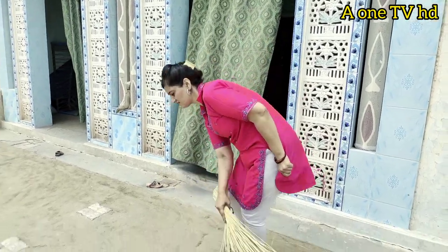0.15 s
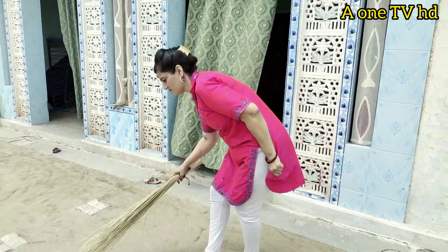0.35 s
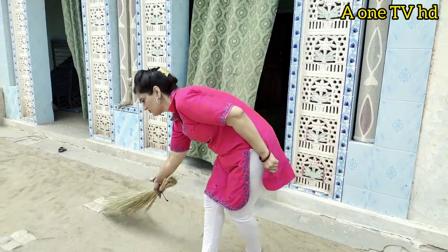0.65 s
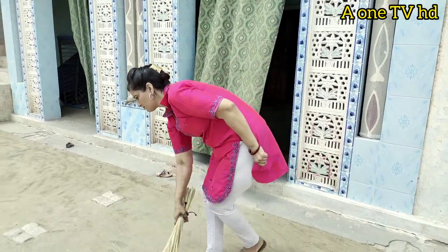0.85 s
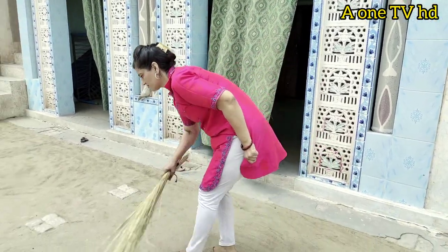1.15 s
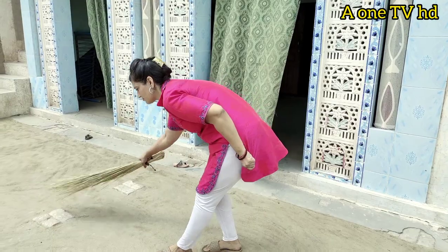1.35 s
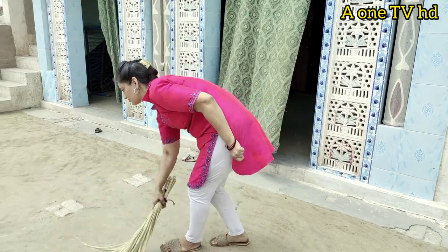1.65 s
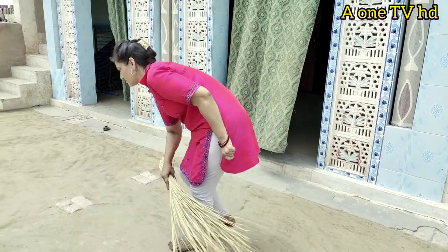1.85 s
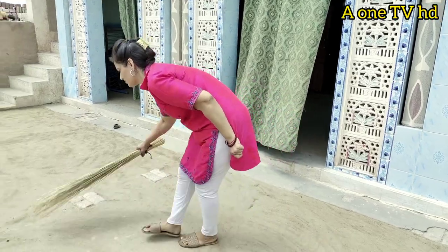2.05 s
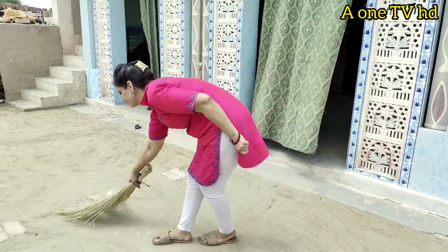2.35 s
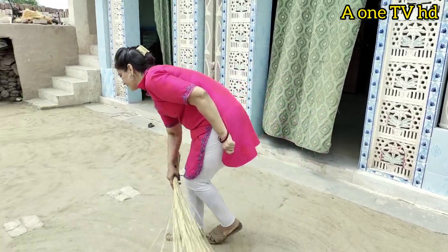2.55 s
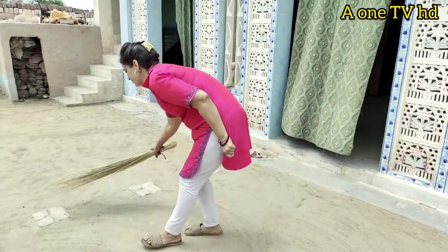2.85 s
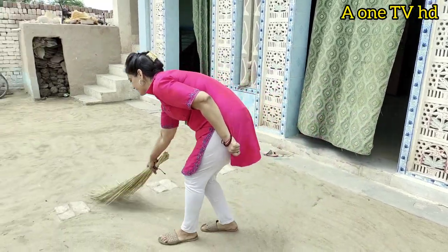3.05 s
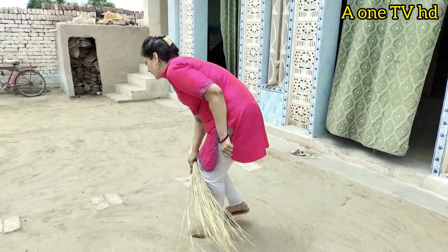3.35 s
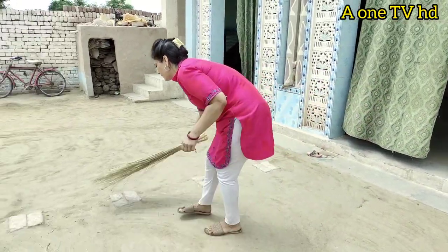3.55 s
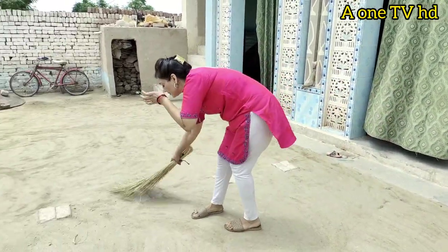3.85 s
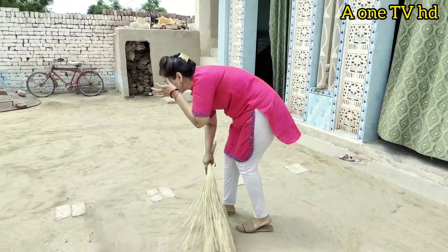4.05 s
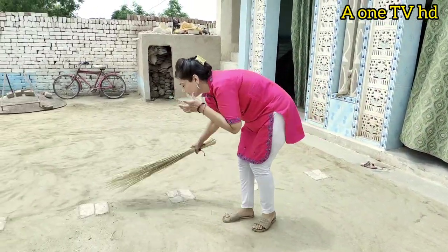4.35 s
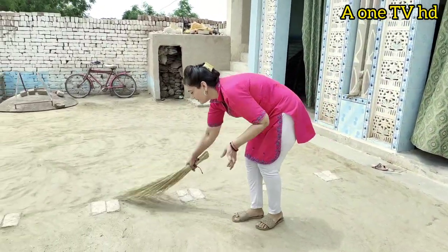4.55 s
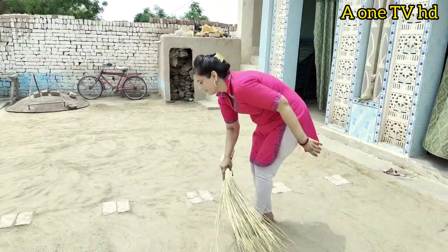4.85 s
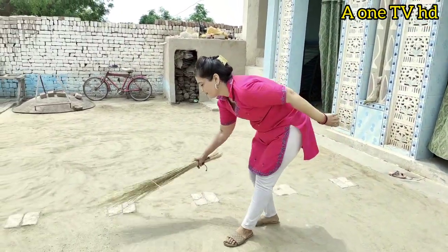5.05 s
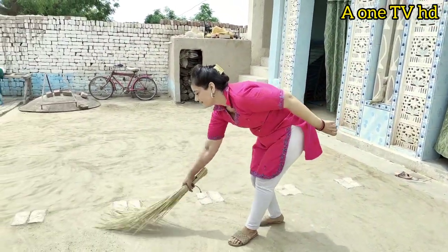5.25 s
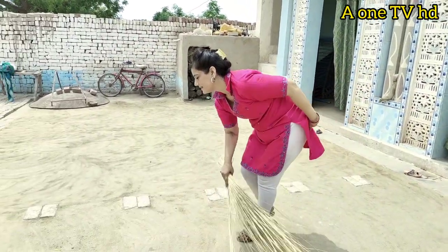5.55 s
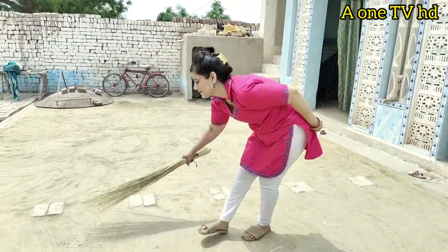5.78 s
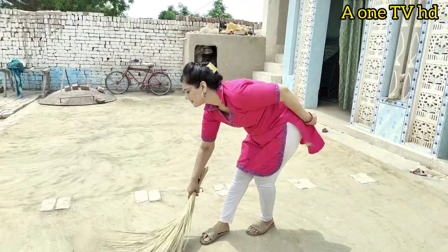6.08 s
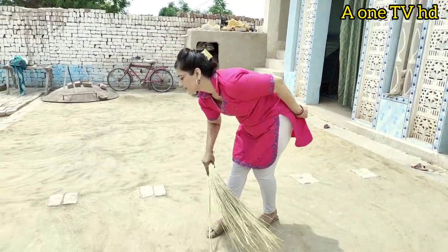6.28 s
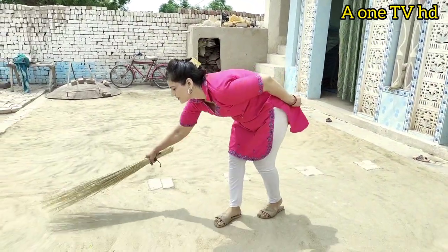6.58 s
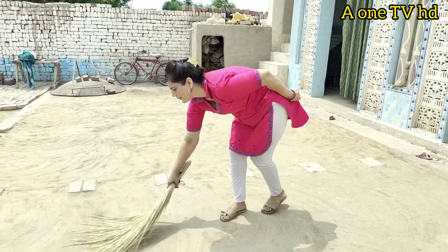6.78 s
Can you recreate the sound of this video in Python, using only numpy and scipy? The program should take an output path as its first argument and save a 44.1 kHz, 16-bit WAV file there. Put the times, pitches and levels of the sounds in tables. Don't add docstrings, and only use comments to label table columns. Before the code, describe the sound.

Close outdoor sweeping on dry dirt: a bundle of grass stalks drags in a bright, grainy swish about every three quarters of a second. Fainter brushes, crisp stalk ticks and soft sandal or handle knocks fill the gaps. Wind thumps the left side of the microphone at the start, then quiet village hum and a few distant bird whistles remain. Later strokes are softer as the sweeper drifts away.

```python
import sys
import numpy as np
from scipy import signal
from scipy.fft import rfft, irfft, next_fast_len
from scipy.io import wavfile
from scipy.ndimage import uniform_filter1d, map_coordinates

SR = 44100
rng = np.random.default_rng(int(sys.argv[2]) if len(sys.argv) > 2 else 0)


def volts_from_decibels(level):
    exponent = np.asarray(level, float) / 20
    return 10 ** exponent


def digitize_waveform(pressure):
    field = np.atleast_2d(pressure).T
    bounded = np.clip(field, -1, 1)
    quanta = np.round(bounded * 32767).astype(np.int16)
    wavfile.write(sys.argv[1], SR, quanta)


N = 305172

# f/Hz, level/dB
LEFT_PORT = [(300, 0), (1000, 2), (1900, 5), (2700, -2), (4300, 3.5), (5200, 1), (5800, 1.5), (7600, 11.5),
             (9800, 1.5), (11300, 7), (12200, 2), (14400, 12.5), (15600, 2)]
RIGHT_PORT = [(300, 0.5), (1000, 0), (1900, 2.5), (2300, -1.5), (2800, 1.5), (4200, 1), (5200, -0.5),
              (5800, 4.5), (6800, 1), (10000, 1.5), (11000, -5), (15000, -4), (15700, -23)]
# f/Hz, level/dB per Hz
HISS = [(4800, -56), (5600, -4), (6200, -3), (16000, 1.5)]
GRIT = [(2200, -20), (2900, -2.5), (5300, 0), (6200, -18)]
SCRAPE = [(250, -31), (500, -11), (900, -8.5), (1600, -3.5), (2600, 0), (3200, -22)]
AIR = [(25, -42), (45, -26), (62, 5.5), (110, 3.5), (175, 4), (250, -0.5), (400, -2), (620, -10.5),
       (900, -3), (2000, -11), (4000, -9.5), (8000, -14.5), (16000, -16.5)]
# f/Hz, left-right correlation/1
BROOM_ALIKE = [(300, 0.77), (1300, 0.79), (2000, 0.24), (2600, 0.33), (3300, 0.85), (4800, 0.14),
               (6800, 0.022)]
AIR_ALIKE = [(60, 1), (130, 0.99), (300, 0.75), (700, 0.72), (1000, 0.14), (3000, 0.096)]
# full contact t/s, hold/s, tip hiss level/dB, landing/(dB/s), lifting/(dB/s)
STROKES = [
    (-.05, 0.083, -21.5, 250, 90),
    (0.802, 0.15, -23, 213, 107),
    (1.596, 0.16, -24.5, 287, 142),
    (2.401, 0.15, -23, 213, 129),
    (3.155, 0.1, -23.5, 172, 100),
    (3.903, 0.17, -26, 234, 116),
    (4.686, 0.16, -27, 354, 130),
    (5.368, 0.16, -27.5, 263, 102),
    (6.097, 0.2, -27.5, 189, 121),
    (6.845, 0.24, -27.5, 250, 120),
]
# t/s, hold/s, level/dB, extra level of thick stalks/dB
BRUSHES = [(0.376, 0.033, -34, -0.5), (0.451, 0.032, -37.5, 0), (0.517, 0.15, -51, 0.5),
           (1.397, 0.095, -54, 5.5), (1.876, 0.11, -46, 0), (2.17, 0.14, -56, 5), (2.673, 0.055, -40, -1),
           (2.79, 0.074, -54, 2), (2.916, .05, -49.5, 7.5), (2.998, .05, -54, 7),
           (3.375, 0.047, -36.5, -1.5), (4.2, 0.044, -46.5, -6), (4.98, 0.11, -51, -4),
           (5.152, 0.088, -52, 3), (5.72, 0.016, -45, -8), (5.786, 0.16, -53, 0), (6.365, 0.015, -42, -12)]
# t/s, level/dB
YARD = [(0.0, -50.5), (0.75, -58), (1.04, -51.5), (1.41, -59), (1.71, -56.5), (3.47, -54.5), (4.03, -61),
        (5.65, -55), (5.9, -59.5), (6.32, -54.5), (6.57, -60.5), (6.92, -57)]
# middle t/s, peak level/dB, f/Hz
BUFFETS = [(.065, -34.5, 105), (0.143, -34, 106), (.18, -44, 120), (0.198, -35, 147), (0.227, -35, 94),
           (.268, -39, 115), (.31, -39, 125), (.335, -40, 104), (0.36, -36, 109), (0.389, -39, 98),
           (0.46, -42, 94), (.52, -46, 90), (.61, -50, 100)]
# t/s, peak level/dB, f/Hz, left-right level/dB
KNOCKS = [(0.237, -31.5, 670, 1.5), (0.573, -38.5, 587, 1.0), (1.383, -38.5, 1490, 3.5),
          (1.883, -39, 600, 0.5), (2.22, -46, 904, 5), (2.256, -36, 1130, 5), (2.834, -26, 634, 2),
          (2.923, -29, 2530, 2), (2.962, -42, 1200, 14), (3.755, -42, 210, 2), (4.429, -35, 2400, -4),
          (4.436, -31.5, 2100, 9), (4.478, -40, 616, -2), (5.132, -32.5, 1870, 8), (5.656, -40, 1060, 2.5),
          (5.988, -40, 743, 2.0), (6.017, -41, 684, 5)]
# delay t/s, level/dB
WALL = [
    (.007, -12),
    (.014, -12),
    (.023, -20),
]
# t/s, peak level/dB, burst/ms
TICKS = [(0.2915, -23, 2.7), (0.3624, -21.5, 3.0), (0.5485, -29, 2.2), (1.4834, -31.5, 3.0),
         (1.9599, -36, 3.0), (2.0886, -24, 1.8), (2.9077, -44, 3.0), (2.9224, -36, 2.6), (4.3334, -38, 3.0),
         (4.398, -31, 3.7), (4.545, -35, 4.7), (4.6128, -38, 3.0), (5.082, -31, 3.0), (5.164, -28, 2.7),
         (5.7113, -25.5, 6.3), (6.3722, -19.5, 3.6), (6.436, -25.5, 1.6), (6.6144, -33, 3.0)]
# t/s, length/s, first f/Hz, last f/Hz, level/dB
WHISTLES = [
    (1.97, 0.13, 270, 235, -62),
    (3.5, 0.1, 2390, 2320, -55),
    (3.585, .13, 2038, 1720, -52.5),
    (5.2, .2, 1431, 1230, -56.5),
    (5.895, .1, 2370, 2050, -64),
]
# f/Hz, level over the neighbouring lines/dB
THINNING = [(1500, -20), (2500, -1), (3200, 0), (4000, 1), (4900, 3), (5400, 8), (5900, 11.5), (6300, 9),
            (6800, -14), (9300, -6), (11000, -20)]
# t/s, threshold shift/dB
THIN_DRIFT = [(0, -2), (.6, 0), (3.1, 1.5), (3.5, -.5), (6.9, -2)]
# t/s, threshold shift/dB
THIN_PEAK = [(0, 5), (3.1, 6.5), (3.8, 2.5), (6.9, 2)]

BRUSH_LANDS, BRUSH_LIFTS = 570, 460
KNEE_DB, REST_DB = 3, -58
NEAR_S, FAR_S = 2.8, 5.6
THICK_LAG_S = (0.002, -0.016)
THICK_LIFTS = 1.013
DIG_FADE_S = 0.11
THIN_START, THIN_HOP = 514, 1024


def unit(x):
    return x / np.sqrt(np.mean(x ** 2) + 1e-20)


def along(points, hz):
    f, v = np.transpose(points)
    return np.interp(np.log(hz + 1), np.log(f + 1), v)


def wobble(rate):
    knots = rng.standard_normal(int(N * rate / SR) + 4)
    return map_coordinates(knots, [np.arange(N) * rate / SR])


def filtered(x, response):
    m = next_fast_len(N + 8192)
    return irfft(rfft(x, m) * response(np.fft.rfftfreq(m, 1 / SR)), m)[..., :N]


def ports(hz, lag_ms):
    lag = np.exp(-1j * np.pi * hz * lag_ms / 1000)
    return np.array([volts_from_decibels(along(LEFT_PORT, hz)) * lag, volts_from_decibels(along(RIGHT_PORT, hz)) / lag])


def heard(pair, spectrum, alike, lag_ms):
    hz = np.fft.rfftfreq(N, 1 / SR)
    turn = np.arccos(np.clip(along(alike, hz), -1, 1)) / 2
    mid, side = rfft(pair) * volts_from_decibels(along(spectrum, hz)) * [np.cos(turn), np.sin(turn)]
    out = irfft(np.array([mid + side, mid - side]) * ports(hz, lag_ms), N)
    return out / np.std(out.mean(0))


def tips(clump_db, loose_db, loose_share):
    rub = rng.standard_normal((2, N)) * volts_from_decibels(clump_db * wobble(700))
    loose = (rng.random(N) < np.clip(loose_share, 0, 1)) * volts_from_decibels(loose_db)
    return rub + loose * rng.standard_normal((2, N))


def slow():
    return np.arange(N // 44 + 2) * 44 / SR


def contact(s, hold, db, lands, lifts):
    t = slow() - s
    slopes = np.logaddexp(-lands * t / KNEE_DB, lifts * (t - hold) / KNEE_DB)
    return volts_from_decibels(db - KNEE_DB * np.logaddexp(0, slopes))


def pressure(near_db=0, far_db=0, thick=0):
    t, power = slow(), 0
    for s, hold, db, lands, lifts in STROKES:
        dig_db = np.interp(s, [NEAR_S, FAR_S], (near_db, far_db))
        lag = np.interp(s, [NEAR_S, FAR_S], THICK_LAG_S)
        depth = np.interp(t - s, [0, hold, hold + DIG_FADE_S], [0, 1, 0]) - 0.5
        touch = contact(s + thick * lag, hold, db, lands, lifts * THICK_LIFTS ** thick)
        power = power + (touch * volts_from_decibels(dig_db * depth)) ** 2
    for s, hold, db, more_db in BRUSHES:
        power = power + contact(s, hold, db + thick * more_db, BRUSH_LANDS, BRUSH_LIFTS) ** 2
    return np.interp(np.arange(N) / SR, t, power)


def drag_gain(db, near_db, far_db, rest_db, thick):
    return np.sqrt(pressure(near_db, far_db, thick) * volts_from_decibels(2 * db) + volts_from_decibels(2 * rest_db))


def broom():
    drag = 0.53 * wobble(25) + 0.66 * wobble(90) + 0.5 * wobble(8.3)

    hiss = heard(tips(0.84, 11.5, 0.0018), HISS, BROOM_ALIKE, lag_ms=0.025)
    hiss *= drag_gain(0, 1, 2, REST_DB, thick=0) * volts_from_decibels(drag + 0.19 * wobble(30))

    grit = heard(tips(0.61, 11, 0.001), GRIT, BROOM_ALIKE, lag_ms=0.027)
    grit *= drag_gain(-8, 2.5, 2, -62, thick=1) * volts_from_decibels(drag + 0.91 * wobble(30) + 0.8 * wobble(45))

    scrape = heard(tips(1.4, 9.6, 0.0013), SCRAPE, BROOM_ALIKE, lag_ms=0.11)
    scrape *= drag_gain(-15.5, 3.5, 2.5, -62.5, thick=1) * volts_from_decibels(drag + 0.49 * wobble(30) + 0.91 * wobble(18))
    return hiss + grit + scrape


def village():
    t = np.arange(N) / SR
    air = volts_from_decibels(-52.5 + 0.44 * wobble(2.59)) * heard(tips(1.0, 3.7, 0.0013), AIR, AIR_ALIKE, lag_ms=0.025)

    dull = [(120, -10), (200, -1.0), (260, 3.5), (400, -5), (600, 3.5), (900, -20.5), (1400, -31.5)]
    duck_db = 3 * np.tanh(pressure() * volts_from_decibels(89))
    yard_db = np.interp(t, *np.transpose(YARD)) - duck_db + 1.2 * wobble(12)
    yard = volts_from_decibels(yard_db) * heard(tips(0.55, 2.7, 0.00088), dull, AIR_ALIKE, lag_ms=0.061)

    hum_hz, width_hz = 172.3, 22
    hum = filtered(rng.standard_normal(N), lambda f: 1 / (1 + (2 * (f - hum_hz) / width_hz) ** 2))
    hum = volts_from_decibels(-62.5) * unit(hum)

    low = [(25, -45), (42, -10), (60, 3.5), (110, 16), (170, -20), (300, -51)]
    rumble = heard(rng.standard_normal((2, N)), low, [(60, 0.28)], lag_ms=0) * volts_from_decibels([[3], [-4]])
    rumble = unit(volts_from_decibels(-3.5 * wobble(2.5) + 1.8 * wobble(17)) * rumble)
    gust_db = 13 * np.exp(-(t / 0.46) ** 2)
    return air + yard + hum + volts_from_decibels(-64.5 + gust_db) * rumble


def buffets():
    t, push = np.arange(SR) / SR, np.zeros(SR)
    for s, db, hz in BUFFETS:
        cycles = (t - s) * hz
        push -= volts_from_decibels(db) * np.exp(-(cycles / 0.84) ** 2) * np.cos(2 * np.pi * cycles)
    return np.pad(push, (0, N - SR)) * volts_from_decibels([[4], [-12]])


def knocks():
    out, t = np.zeros((2, N + SR)), np.arange(SR // 20) / SR
    for s, db, hz, pan_db in KNOCKS:
        cycles = 1.05 * t * hz - 1.5
        swing = np.exp(-(cycles / 0.39) ** 2) * np.cos(2 * np.pi * cycles)
        after = 0.28 * np.exp(-((cycles - 1) / 0.5) ** 2) * np.cos(2 * np.pi * cycles)
        pan = volts_from_decibels([[pan_db / 2], [-pan_db / 2]])
        out[:, round(s * SR):][:, :len(t)] += volts_from_decibels(db + 1.0) * (swing + after) * pan
    out = out[:, :N]
    return out + sum(volts_from_decibels(db) * np.roll(out, round(s * SR), axis=1) for s, db in WALL)


def ticks():
    shape, t = np.zeros(N + SR), np.arange(SR // 10) / SR
    for s, db, ms in TICKS:
        u = t / (ms / 3000 + 1e-4)
        shape[round(s * SR):][:len(t)] += volts_from_decibels(db - 9.5) * u * np.exp(1 - u)
    bright = [(2500, -36), (4500, -4.5), (8000, -2.5), (16000, -2.0)]
    return shape[:N] * heard(rng.standard_normal((2, N)), bright, BROOM_ALIKE, lag_ms=0.016)


def bird():
    out, t = np.zeros((2, N)), np.arange(N) / SR
    for s, hold, first_hz, last_hz, db in WHISTLES:
        turn = 2 * np.pi * np.cumsum(np.interp(t, [s, s + hold], [first_hz, last_hz])) / SR
        rate = first_hz / 8
        smear = [wobble(rate) * np.sin(turn) + wobble(rate) * np.cos(turn) for ear in range(2)]
        gain = np.interp(t, slow(), contact(s, hold, db, 400, 400)) * volts_from_decibels(1.3 * wobble(30))
        out += gain * (0.52 * np.sin(turn) + np.array(smear))
    return out


def thin_out(x):
    hop = THIN_HOP
    n, k = np.arange(2 * hop) + 0.5, np.arange(hop) + 0.5
    window = np.sin(np.pi * n / 2 / hop)
    basis = window * np.cos(np.pi / hop * np.outer(k, n + hop / 2)) * np.sqrt(2 / hop)
    count = N // hop + 3
    padded = np.pad(x, ((0, 0), (2 * hop - THIN_START, 3 * hop)))
    blocks = padded[:, :(count + 1) * hop].reshape(2, -1, hop)
    lines = np.concatenate([blocks[:, :-1], blocks[:, 1:]], axis=2) @ basis.T

    level_db = 20 * np.log10(np.abs(lines) + 1e-9)
    around_db = uniform_filter1d(level_db, size=140, axis=2)
    bands = rng.standard_normal((count, hop // 16)).repeat(16, axis=1)

    s = (THIN_START + hop * (np.arange(count) - 1)) / SR
    before = sum(np.exp(-((s + 0.1 - row[0]) / 0.21) ** 2) for row in STROKES[1:])
    shift_db = np.interp(s, *np.transpose(THIN_DRIFT)) + before * np.interp(s, *np.transpose(THIN_PEAK))
    limit_db = around_db + along(THINNING, k * SR / 2 / hop) + shift_db[:, None] + 4.5 * bands

    halves = (lines * (level_db > limit_db)) @ basis
    joined = halves[:, 1:, :hop] + halves[:, :-1, hop:]
    return joined.reshape(2, -1)[:, hop - THIN_START:][:, :N]


def scene():
    return broom() + village() + buffets() + knocks() + ticks() + bird()


def top_cut(x):
    return signal.sosfilt(signal.butter(12, 16500, fs=SR, output="sos"), x)


def record(dry):
    banded = filtered(dry, lambda hz: (hz < 15650) / (1 + (33 / (hz + 1)) ** 4))
    return top_cut(thin_out(banded))


dry = scene()
out = record(dry)
digitize_waveform(out)
```